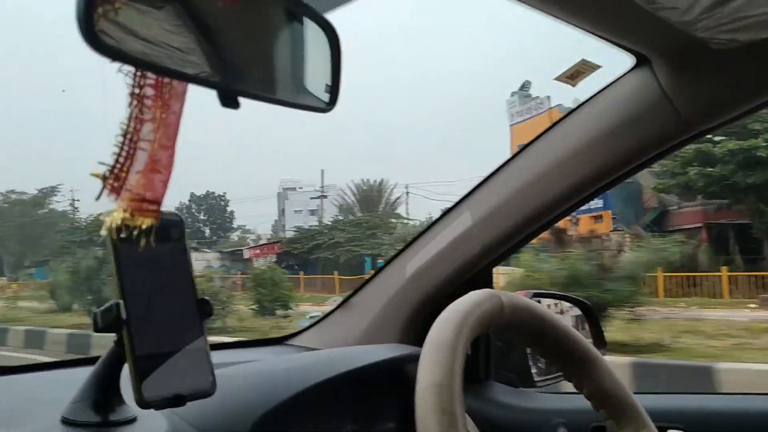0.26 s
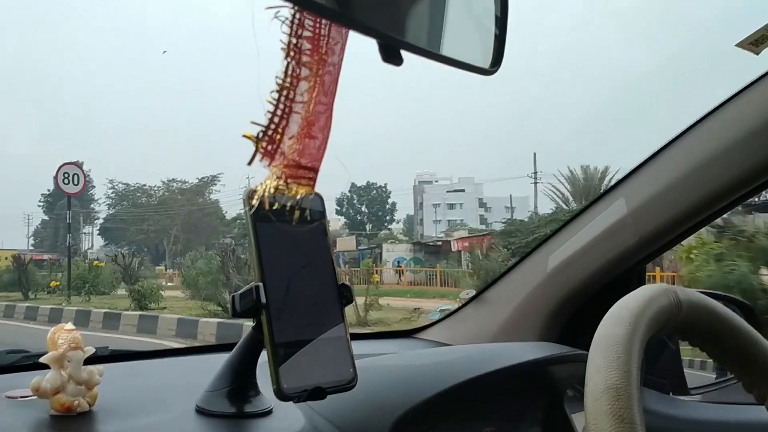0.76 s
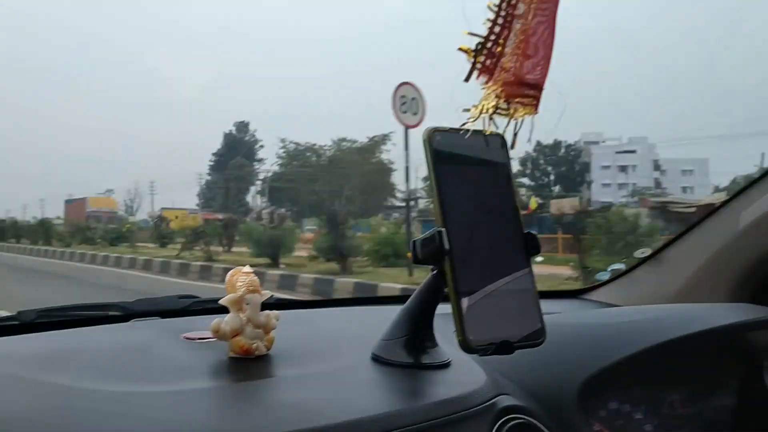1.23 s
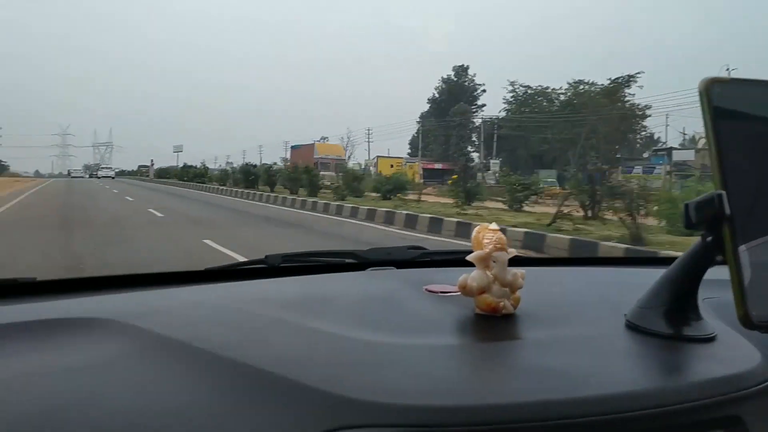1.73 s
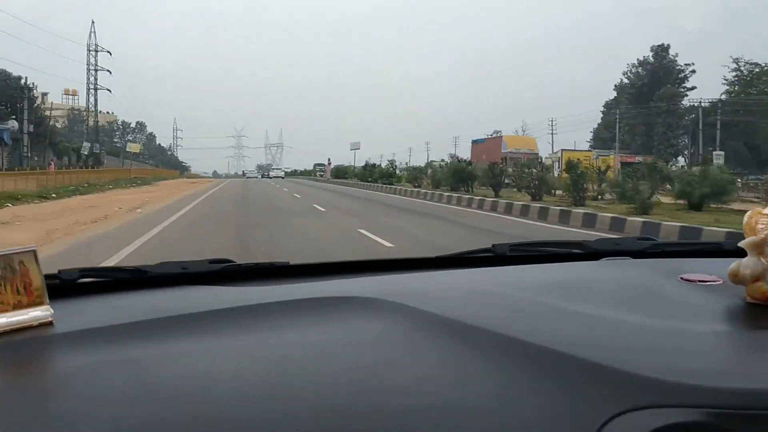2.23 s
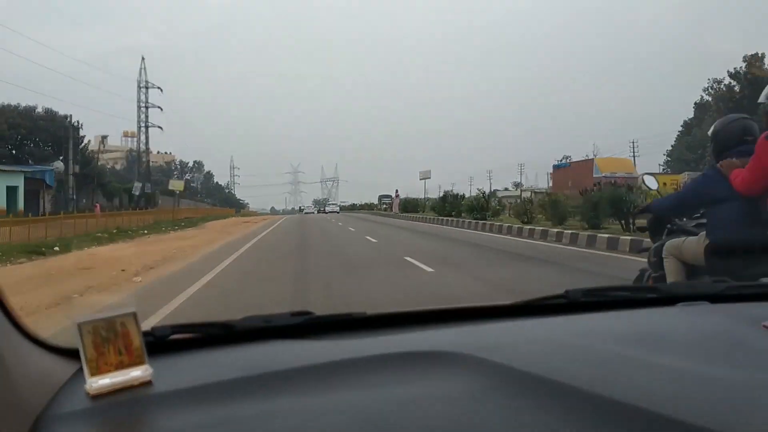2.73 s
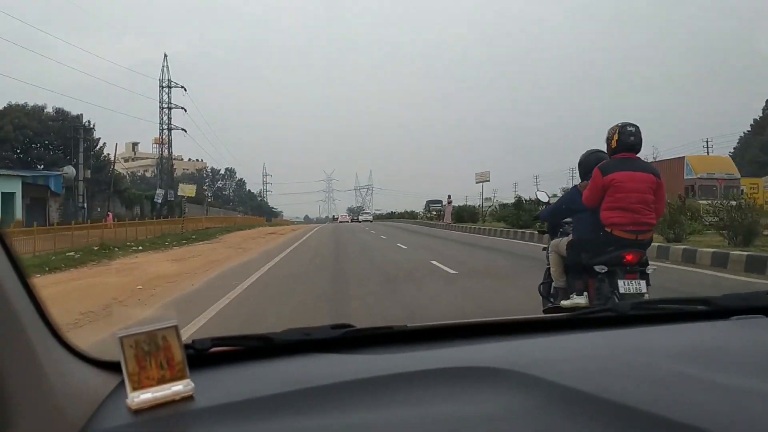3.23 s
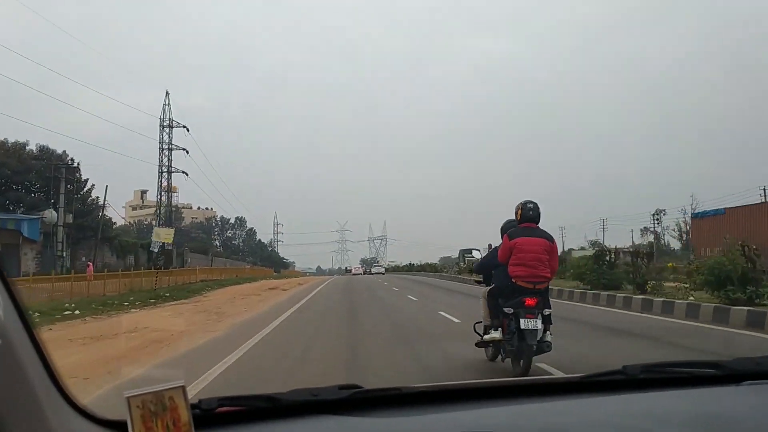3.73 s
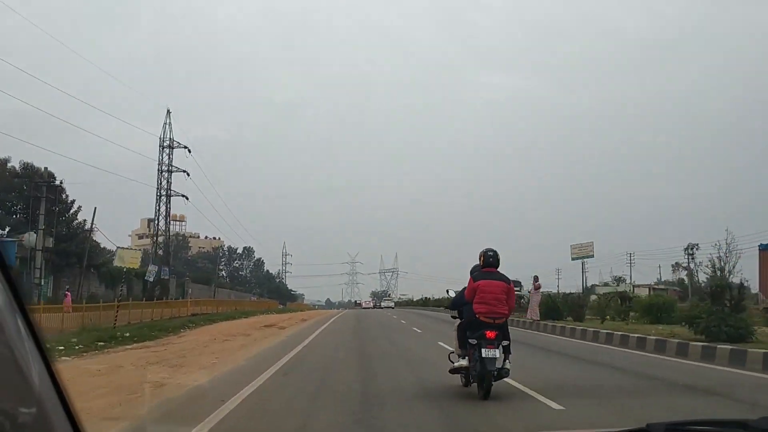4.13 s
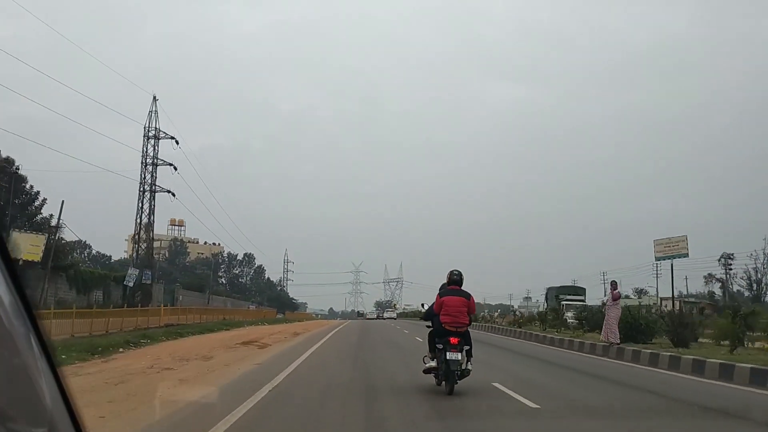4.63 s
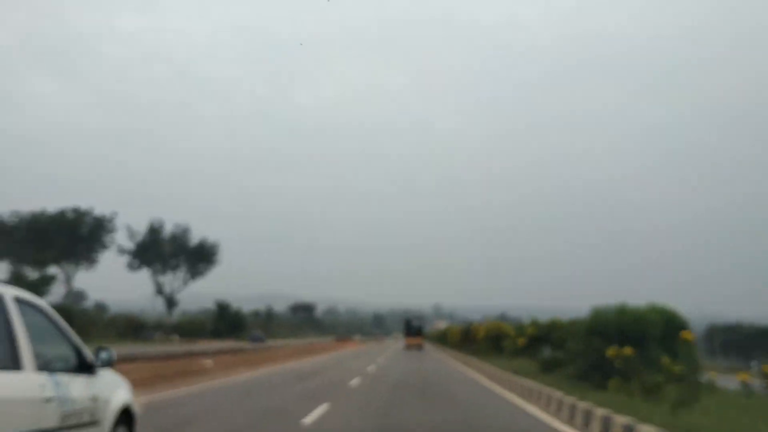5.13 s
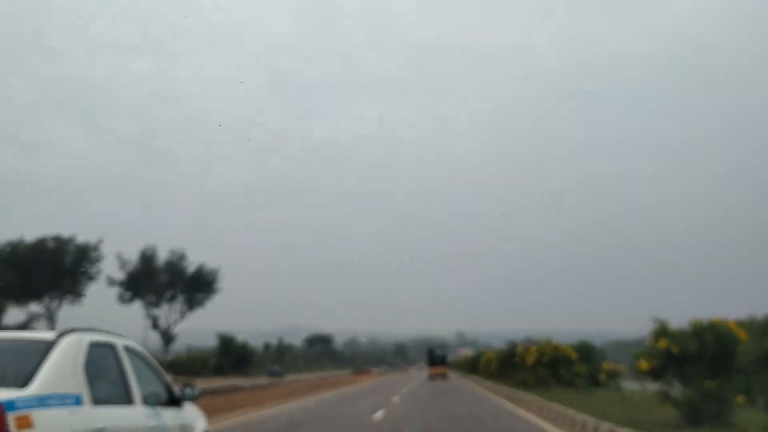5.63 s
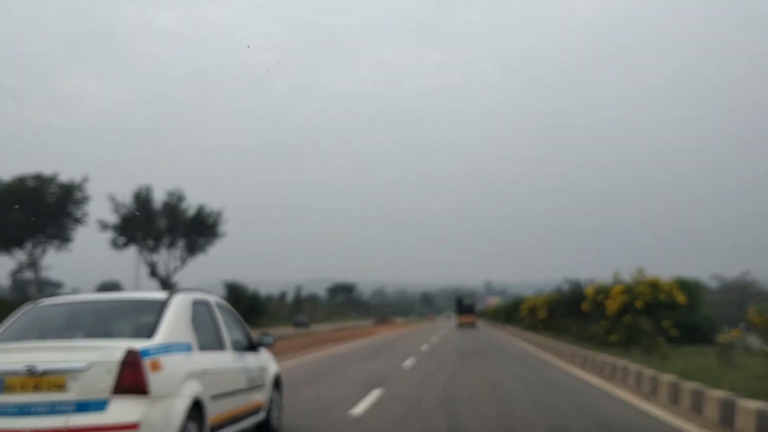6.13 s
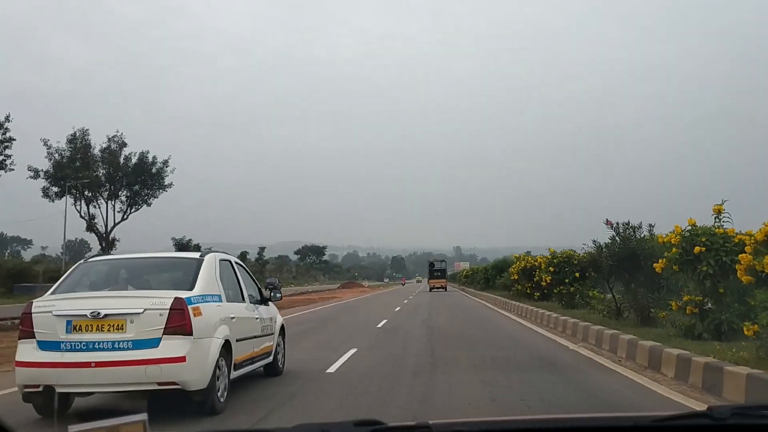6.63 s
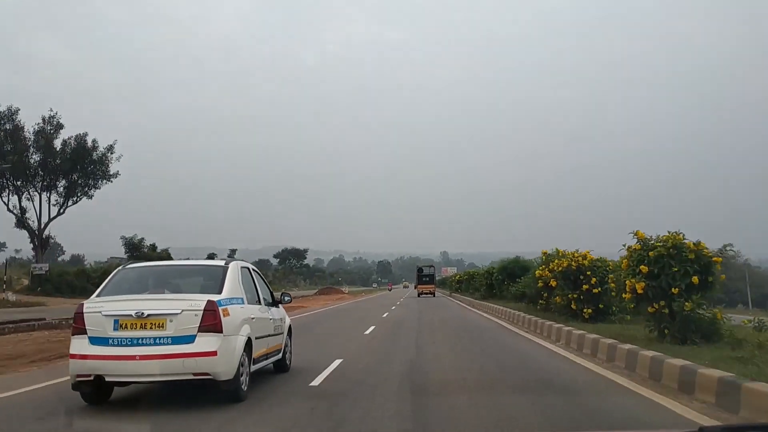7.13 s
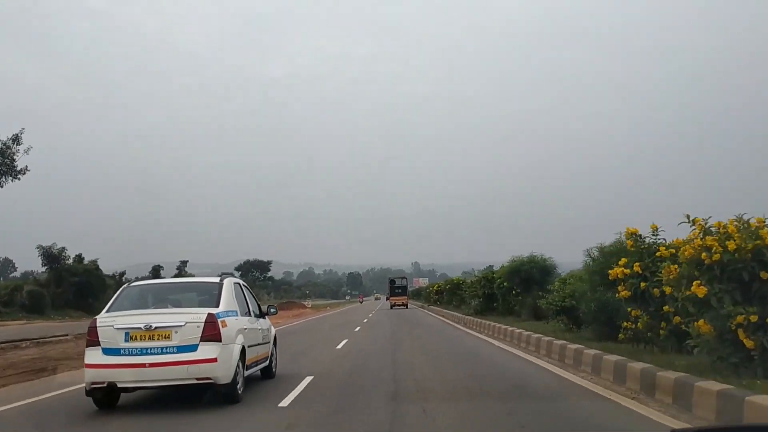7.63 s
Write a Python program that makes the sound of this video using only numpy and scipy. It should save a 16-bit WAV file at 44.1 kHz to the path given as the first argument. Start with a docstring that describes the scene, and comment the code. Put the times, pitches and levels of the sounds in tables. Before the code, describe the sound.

Close cabin sound, dominated by low road rumble. Window glass rattles free with a few dry clacks and a soft pressure thump, then wind and tyre hiss enter as a motorbike overtakes with a raspy, pulsing exhaust and recedes. Sound cuts out for an instant, returns with a snap and builds into heavier bass, throbbing with the wheel, as a neighbouring car adds rushing air, a wavering tread hum and small trim ticks.

```python
"""Inside a car on a highway, two stretches of the drive joined by a short silence.
First: shaped noise gives body boom, tyre roar and seal wind; noise bursts clack the side window open,
letting in air and tyre hiss; a motorbike overtakes, its firing pulses ringing resonators; trim clicks.
Then: louder, swelling up from the silence; a car draws alongside in noise bands, a tread hum and ticks;
a sine throbs once per wheel turn and trim ticks along with it."""
import sys
import numpy as np
from scipy import signal
from scipy.fft import rfft, irfft, next_fast_len
from scipy.io import wavfile

SR = 44100
rng = np.random.default_rng(int(sys.argv[2]) if len(sys.argv) > 2 else 0)


def output_pcm(signal):
    """Save a mono or channel-first signal as 16-bit PCM at the path in sys.argv[1].

    Samples are clipped to [-1, 1] before scaling.
    """
    pcm = np.clip(np.atleast_2d(signal).T, -1, 1) * 32767
    wavfile.write(sys.argv[1], SR, np.round(pcm).astype(np.int16))


N = 347508
TIME = np.arange(N) / SR

# silence between the stretches
SILENCE_START_S, SILENCE_END_S = 4.901, 5.024
LATER = TIME > SILENCE_END_S
FADE_OUT_S, FADE_IN_S = .008, .001

# cabin; noise spectra are relative: freq_hz, density_db
# body boom, first stretch: freq_hz, density_db
BOOM_FIRST = [(7.1, -42.5), (12, -1), (27, 3.5), (45, -3.5), (65, -3), (81, -13.5), (134, -7), (146, -5),
              (172, -13.5), (198, -14.5), (221, -28), (243, -31), (330, -33), (430, -47), (730, -120)]
# body boom, second stretch: freq_hz, density_db
BOOM_SECOND = [(1.8, -39.5), (3.0, 3), (16, 7.5), (26, -3.5), (47, -3), (75, -9), (139, -10), (210, -22.5),
               (246, -32), (330, -30.5), (430, -34), (730, -120)]
# body panel resonances: freq_hz, width_hz (of one pass), level_db (over the boom)
PANELS = [(23.2, 8, -16), (50.7, 5.8, -11), (98.79, 9.6, -17), (144.7, 19.5, -18.5), (194, 17, -30),
          (244.7, 7.8, -37.5), (397, 63, -38.5)]
# tyre roar in the closed cabin, first stretch: freq_hz, density_db
ROAR_FIRST = [(150, -10), (250, -8), (353, -10.5), (413, -3.5), (452, -11.5), (505, -16), (565, -16.5),
              (624, -15), (675, -15), (943, -21), (1100, -17), (1190, -16.5), (1600, -22.5), (2500, -26),
              (3200, -36.5), (3800, -38.5), (4680, -76.5), (7920, -120)]
# tyre roar, second stretch: freq_hz, density_db
ROAR_SECOND = [(150, -43), (250, 2), (328, -7.5), (459, -7), (543, -15), (780, -15), (854, -17),
               (1150, -10), (1490, -13.5), (2080, -21), (3110, -34), (3830, -30.5), (5500, -41.5),
               (7150, -73), (12100, -120)]
# wind past the door seals: freq_hz, density_db
SEALS = [(2060, -31), (3500, -28), (3770, -1), (4610, -7), (6540, -6), (7940, -6), (11800, -13.5),
         (14800, -0.5), (15600, 0)]
# air pumping at the open window: freq_hz, density_db
BUFFET = [(3, 6), (6, 0), (12, -16), (18, -37)]
# cabin base levels: first_stretch_db, second_stretch_db
BOOM_DB, ROAR_DB, SEALS_DB = (-24, -15.5), (-46, -38), (-65, -63)
BOOM_RISE_DB_PER_S = 0.66  # first stretch, reaching the base level at its end
BUMPS_DB = 1.1  # spread; uneven road swells the whole boom at once
SWELL_DB, SWELL_TIME_CONSTANT_S = 12, 0.53  # shortfall just after the silence; how it dies
BOOM_SHARE, ROAR_SHARE, SEALS_SHARE, THROB_SHARE = 1, 1.46, 0.96, 3.5  # of that shortfall

# window: glass leaves its seal, then drops
AJAR_S, OPEN_S, OPENING_S, AJAR_DB = .84, 0.94, 0.017, -11
BUFFET_STEADY_DB = -37
THUMP_DB, THUMP_S, THUMP_SPREAD_S = -22, 0.926, 0.086  # pressure thump as the glass drops
# glass freeing itself: start_s, peak_db, centre_hz, half_width_octaves, rise_s
GLASS = [(.836, -37, 11800, 0.73, 0.0018), (.845, -37, 990, .6, .004), (.879, -36.5, 1000, 0.67, .002),
         (.892, -32.5, 1950, 0.39, 0.0011), (.893, -36, 3000, 0.32, 0.001),
         (.926, -39.5, 7600, 0.148, 0.016), (.945, -35.5, 8000, .25, .01), (.936, -34, 14400, .15, 0.0022),
         (0.947, -33, 2300, 0.4, 0.006), (0.948, -33, 4200, 0.46, 0.0068), (0.977, -37, 3760, 0.17, .002),
         (1.075, -37, 3780, 0.167, .001)]
GLASS_T60_S = 0.056
DOOR_HZ, DOOR_DB = 794, -8  # door panel thud under each clack; dB over it

# outside air and motorbike
# air rush, first stretch: freq_hz, density_db
RUSH_FIRST = [(290, -44.5), (500, -9), (558, -8.5), (690, -2.5), (814, -7.5), (1700, -6), (2000, -6.5),
              (2640, -13), (3450, -38), (4500, -39), (5850, -65), (9900, -120)]
# tyre hiss, both stretches: freq_hz, density_db
HISS = [(1760, -0.5), (3000, 0.5), (3610, -6.5), (4700, -7), (5660, -6), (6540, -6), (8100, -2.5),
        (9360, -11), (13200, -6), (14400, -2), (15600, -0.5)]
TRAFFIC_DB, BIKE_RUSH_DB, BIKE_HISS_DB = -49, -43, -43  # steady far traffic; bike at its closest
RUSH_FALL, HISS_FALL, NOTE_FALL = 1.5, 1.47, 0.98  # powers of distance
NEAREST_S, PASS_S = 1.487, 0.59  # closest approach; time to move one closest distance along
NOTE_LAG_S = 0.2  # low note peaks this long after closest approach
FIRINGS_PER_S, FIRINGS_RISE_PER_S2 = 47.2, .21  # rate at 0 s; gain each second
FIRING_SPREAD_DB, EXHAUST_RASP = 3.5, 1.2  # uneven firings; gas noise beside the puffs
EXHAUST_FLUTTER_DB, VALVE_FLUTTER_DB = 2.2, 3.2  # gusty path; rattle comes and goes
# exhaust resonances, each row one swell of a ringing band during the pass:
# freq_hz, t60_s (of one pass through the resonance), level_db (rms), loudest_s, spread_s
EXHAUST = [(700, .058, -49, 1.1, .06), (715, .06, -45.5, 1.48, .045), (710, .04, -48.5, 1.61, .03),
           (720, .045, -48, 1.79, .08), (623, .05, -53, 1.75, .3), (720, .059, -56, 2.35, .25),
           (730, .054, -55, 2.97, .3), (738, .074, -56.5, 4.02, .58), (1004, .021, -49, 1.07, .018),
           (1060, .03, -46.5, 1.22, .066), (1100, .04, -45, 1.43, .043), (1047, .05, -56, 2.1, .5),
           (1055, .05, -60, 3.9, .7), (1493, .03, -49, 1.75, .15), (1680, .03, -48.5, 1.17, .05),
           (1760, .03, -48, 1.45, .02), (1637, .034, -46, 1.65, .054), (1696, .025, -50, 1.95, .12),
           (1900, .02, -47, 1.18, .07), (1840, .033, -47, 1.75, .06), (1820, .02, -52.5, 2.27, .12),
           (1840, .016, -52.5, 2.55, .15), (1880, .02, -56, 2.9, .2), (1930, .035, -57, 3.2, .15),
           (1880, .02, -63, 3.7, .3), (2258, .022, -52, 1.55, .3), (2700, .012, -53, 1.07, .06),
           (2564, .012, -52.5, 1.33, .06), (2500, .018, -49, 1.46, .04), (2620, .033, -56, 1.95, .2),
           (2730, .03, -61, 3.05, .07)]
# treble rattle resonances, each row one swell of a ringing band as the bike goes by:
# freq_hz, t60_s (of one pass through the resonance), level_db (rms), loudest_s, spread_s
RATTLE = [(5800, .005, -57, 1.12, .1), (3640, .0073, -63, 2.72, .16), (3620, .008, -65.5, 3.3, .15),
          (3620, .007, -64, 3.82, .1), (3980, .008, -67, 3.07, .04), (6000, .0046, -65, 2.9, .17),
          (8190, .004, -62.5, 2.52, .48), (7350, .0062, -63.5, 3.1, .16), (6600, .005, -65, 2.85, .17),
          (7130, .003, -70, 4.22, .6), (7440, .0058, -65, 4.02, .25)]
# low harmonics of the firing rate: multiple, level_db (rms at the note's loudest)
EXHAUST_NOTE = [(3, -36.5), (5, -54), (6, -54)]

# trim
# clicks: start_s, peak_db, centre_hz, half_width_octaves
TRIM = [(3.275, -48, 8300, .15), (3.342, -44, 14600, .06), (3.418, -46, 7900, .08),
        (3.467, -46, 14300, .08), (3.485, -48, 7700, .08), (4.09, -53, 11000, .27),
        (5.889, -36, 14500, 0.3), (6.87, -47, 14500, .27), (7.419, -48, 14600, .27)]
TRIM_T60_S = 0.14
# one dry snap: start_s, peak_db, centre_hz, half_width_octaves, t60_s
SNAP = (5.09, -42, 6800, 1.35, .005)

# car alongside
# its air rush: freq_hz, density_db
RUSH_SECOND = [(350, -39), (600, -7), (919, -9.5), (1110, -1), (1660, -6), (2170, -5), (3020, -19),
               (5000, -44.5), (6500, -73), (11000, -120)]
# its engine and tread tones: freq_hz, width_hz (of one pass), level_db (over the rush)
CAR_TONES = [(103.2, 15, 0.5), (244.13, 8.05, -5), (725, 161, -13), (2070, 170, -16)]
# levels as it draws alongside: time_s, rush_db, hiss_db
CAR_LEVELS = [(5.03, -55, -78), (5.16, -46, -66), (5.55, -45.5, -66.5), (5.9, -40, -52), (6.3, -41.5, -60),
              (6.85, -43.5, -60), (7.4, -42, -60.5), (7.65, -41, -56.5), (7.88, -42, -60)]
# tread hum: time_s, pitch_hz
TREAD = [(5.1, 1123), (5.8, 1110), (6.5, 1129), (7.2, 1176), (7.88, 1153)]
TREAD_WIDTH_HZ, TREAD_WAVER_HZ, TREAD_DB = 80, 10, -2.5  # dB over the rush
CAR_TICKS_PER_S = 39.5
# what the injector ticks ring: freq_hz, t60_s (of one pass), level_db (rms), loudest_s, spread_s
INJECTORS = [(8250, 0.00108, -62.5, 5.96, 0.17), (14900, .0015, -59, 5.96, 0.086)]
# short whistle of air: freq_hz, t60_s (of one pass), level_db (rms), loudest_s, spread_s
WHISTLE = [(8000, .004, -65, 7.64, 0.055)]

# wheel
WHEEL_TURNS_PER_S, THROB_DB = 10.58, -20.5
# trim ticks on some wheel turns: start_s, peak_db
WHEEL_TICKS = [(5.3712, -57.5), (6.2413, -44), (6.4298, -44), (6.5251, -41), (6.6204, -54), (6.8088, -48),
               (6.998, -44), (7.1871, -47), (7.2804, -48), (7.376, -47)]

# output
OVERLOAD_PEAK, CUTOFF_HZ = 0.746, 15700


def from_db(db):
    """Gain of a level in dB."""
    return np.exp(np.asarray(db) * (np.log(10) / 20))


def rms_one(x):
    """Scale to rms 1."""
    return x / np.sqrt(np.mean(x ** 2) + 1e-20)


def in_time(rows):
    """Columns of a time table, interpolated at every sample."""
    time_s, *columns = np.transpose(rows)
    return [np.interp(TIME, time_s, column) for column in columns]


def drift(rate_hz):
    """Slow random wander of spread 1, about rate_hz changes a second."""
    step = 40  # samples between wander points
    r = np.exp(-2 * np.pi * rate_hz * step / SR)
    noise = rng.standard_normal(N // step + 2002)
    slow = signal.lfilter([1], [1, -2 * r, r * r], noise)[2000:]
    joined = np.linspace(slow[:-1], slow[1:], step, endpoint=False, axis=1).ravel()[:N]
    return joined / np.sqrt(np.mean(slow ** 2))


def coloured(spectrum, patchy_db, rate_hz, count=6):
    """Noise of this spectrum in overlapping bands flickering partly together, partly alone; rms 1."""
    size = next_fast_len(N)
    log_hz = np.log(np.arange(size // 2 + 1) * SR / size + 1e-9)
    freq_hz, density_db = np.transpose(spectrum)
    gain = from_db(np.interp(log_hz, np.log(freq_hz), density_db, -200, -200))
    shaped = rfft(rng.standard_normal(size)) * gain
    centres = np.linspace(np.log(freq_hz[0]), np.log(freq_hz[-1]), count)
    together = drift(rate_hz)
    out = 0
    for k in range(count):
        weight = np.interp(log_hz, centres, np.arange(count) == k)
        band = irfft(shaped * weight, size)[:N]
        out = out + band * from_db(patchy_db * (0.29 * together + 0.894 * drift(rate_hz)))
    return rms_one(out)


def resonant(modes, patchy_db):
    """Noise passed twice through each resonance, each swelling on its own."""
    out = 0
    for freq_hz, width_hz, level_db in modes:
        r = np.exp(-np.pi * width_hz / SR)
        poles = [1, -2 * r * np.cos(2 * np.pi * freq_hz / SR), r * r]
        once = signal.lfilter([1, 0, -1], poles, rng.standard_normal(N))
        twice = signal.lfilter([1, 0, -1], poles, once)
        out = out + rms_one(twice) * from_db(level_db + patchy_db * drift(4.8))
    return out


def burst(start_s, centre_hz, half_width_octaves, t60_s, rise_s=.0005):
    """Band of noise that rises quickly and dies; peak 1."""
    ratio = 2 ** half_width_octaves
    edges_hz = [centre_hz / ratio, min(centre_hz * ratio, .45 * SR)]
    after_s = TIME[:8192]
    decay = from_db(np.maximum(-60 * after_s / t60_s, -200))
    rise = np.minimum(after_s / max(rise_s, 1e-4), 1)
    puff = rng.standard_normal(len(after_s)) * decay * rise
    puff = signal.sosfilt(signal.butter(3, edges_hz, "band", fs=SR, output="sos"), puff)
    out = np.zeros(N)
    out[int(start_s * SR):][:len(after_s)] = puff / np.abs(puff).max()
    return out


def bell(peak_db, loudest_s, spread_s):
    """Gain that swells to peak_db at one moment and sinks again."""
    return from_db(peak_db) * np.exp(-.5 * ((TIME - loudest_s) / spread_s) ** 2)


def ringing(drive, freq_hz, t60_s):
    """Drive through one resonance twice, which keeps the ring narrow; rms 1."""
    r = from_db(-60 / (t60_s * SR))
    w = 2 * np.pi * freq_hz / SR
    section = [0.93, 0.0016, -0.944, 1, -2 * r * np.cos(w), r * r]
    return rms_one(signal.sosfilt([section] * 2, drive))


def struck(drive, swells, flutter_db=2.5):
    """Drive rings each resonance, which swells and sinks around its loudest moment and flutters."""
    out = 0
    for freq_hz, t60_s, level_db, loudest_s, spread_s in swells:
        gain = bell(level_db + flutter_db * drift(8.2), loudest_s, spread_s)
        out = out + ringing(drive, freq_hz, t60_s) * gain
    return out


def distance_db(nearest_s):
    """Distance of the passing motorbike over its closest distance, in dB."""
    return 10 * np.log10(1 + ((TIME - nearest_s) / PASS_S) ** 2)


def swell_db():
    """Shortfall of level just after the silence, dying away."""
    since_s = TIME - SILENCE_END_S
    return -SWELL_DB * np.exp(-np.abs(since_s) / SWELL_TIME_CONSTANT_S) * (since_s > 0)


def ajar_ramp():
    """Rises 0 to 1 as the glass leaves its seal."""
    return np.clip((TIME - AJAR_S) / OPENING_S, 0, 1)


def body_boom():
    """Road shakes the body: deep noise plus panel resonances, swelling over bumps."""
    first = coloured(BOOM_FIRST, 0.2, 7.5, count=4)
    second = coloured(BOOM_SECOND, 1.1, 9.6, count=4)
    boom = np.where(LATER, second, first) + resonant(PANELS, patchy_db=-0.5)
    rise_db = BOOM_RISE_DB_PER_S * np.minimum(TIME - SILENCE_START_S, 0)
    return boom * from_db(rise_db + BUMPS_DB * drift(7.6))


def tyre_roar():
    """Muffled tyre noise inside the cabin."""
    first = coloured(ROAR_FIRST, 0.57, 7.7, count=4)
    second = coloured(ROAR_SECOND, 0.53, 1.3, count=4)
    return np.where(LATER, second, first)


def cabin():
    """Boom, roar and seal wind at their level in each stretch."""
    seal_wind = coloured(SEALS, 4.7, 8.6, count=4)
    layers = [(body_boom(), BOOM_DB, BOOM_SHARE), (tyre_roar(), ROAR_DB, ROAR_SHARE),
              (seal_wind, SEALS_DB, SEALS_SHARE)]
    out = 0
    for sound, (first_db, second_db), share in layers:
        out = out + sound * from_db(np.where(LATER, second_db + share * swell_db(), first_db))
    return out


def buffeting():
    """Very low air pumping at the open window, first stretch, with a thump as the glass drops."""
    steady = from_db(BUFFET_STEADY_DB) * ajar_ramp() * ~LATER
    gain = steady + bell(THUMP_DB, THUMP_S, THUMP_SPREAD_S)
    return gain * coloured(BUFFET, 0.83, 1.5, count=2)


def glass_clacks():
    """Glass freeing itself: noise bursts, each with a door panel thud under it."""
    out = 0
    for start_s, peak_db, centre_hz, half_width_octaves, rise_s in GLASS:
        clack = burst(start_s, centre_hz, half_width_octaves, GLASS_T60_S, rise_s)
        thud = burst(start_s, DOOR_HZ, 0.22, GLASS_T60_S, rise_s)
        out = out + from_db(peak_db) * (clack + from_db(DOOR_DB) * thud)
    return out


def outside():
    """Air, passing tyres and engines, let in once the window opens."""
    far_db = distance_db(NEAREST_S)
    rush_db, hiss_db = in_time(CAR_LEVELS)
    bike_gain = from_db(BIKE_RUSH_DB - RUSH_FALL * far_db)
    first_gain = np.hypot(from_db(TRAFFIC_DB), bike_gain)  # powers add
    first_rush = first_gain * coloured(RUSH_FIRST, 1.24, 6.74, count=4)
    rush = np.where(LATER, from_db(rush_db) * car_rush(), first_rush)
    hiss_gain = from_db(np.where(LATER, hiss_db, BIKE_HISS_DB - HISS_FALL * far_db))
    hiss = hiss_gain * coloured(HISS, 1.7, 25.0)
    still_ajar = np.clip(1 - (TIME - OPEN_S) / OPENING_S, 0, 1)
    window = ajar_ramp() * from_db(AJAR_DB * still_ajar)
    return window * (rush + hiss + motorbike() * ~LATER + car_engine())


def motorbike():
    """Firings drive exhaust resonances with rasping puffs, a treble rattle with noisy knocks; a low note hums."""
    firings = FIRINGS_PER_S * TIME + FIRINGS_RISE_PER_S2 * TIME ** 2 / 2
    phase = firings % 1
    pulses = np.diff(np.floor(firings), prepend=0) * from_db(rng.normal(0, FIRING_SPREAD_DB, N))
    gas = rng.standard_normal(N) * (.4 + np.exp(-phase / 0.42))
    puffs = rms_one(pulses) + EXHAUST_RASP * gas
    knocks = rng.standard_normal(N) * np.exp(-phase / 0.3)
    note = 0
    for multiple, level_db in EXHAUST_NOTE:
        tone = np.sqrt(2) * np.sin(2 * np.pi * multiple * firings)
        note = note + tone * from_db(level_db + 2.2 * drift(3.0))
    note = note * from_db(-NOTE_FALL * distance_db(NEAREST_S + NOTE_LAG_S))
    exhaust = struck(puffs, EXHAUST, flutter_db=EXHAUST_FLUTTER_DB)
    rattle = struck(knocks, RATTLE, flutter_db=VALVE_FLUTTER_DB)
    return exhaust + rattle + note


def trim_clicks():
    """Cabin trim: short noise clicks and one dry snap."""
    start_s, peak_db, centre_hz, half_width_octaves, t60_s = SNAP
    out = from_db(peak_db) * burst(start_s, centre_hz, half_width_octaves, t60_s)
    for start_s, peak_db, centre_hz, half_width_octaves in TRIM:
        out = out + from_db(peak_db) * burst(start_s, centre_hz, half_width_octaves, TRIM_T60_S)
    return out


def car_rush():
    """Air rush in the second stretch, with the other car's resonant tones and tread hum."""
    air = coloured(RUSH_SECOND, 1.0, 6.8, count=4)
    return air + resonant(CAR_TONES, patchy_db=-1.5) + from_db(TREAD_DB) * tread_hum()


def tread_hum():
    """Narrow band of noise riding on the tread's wavering pitch; rms 1."""
    pitch_hz, = in_time(TREAD)
    phase = 2 * np.pi * np.cumsum(pitch_hz + TREAD_WAVER_HZ * drift(3.992)) / SR
    lowpass = signal.butter(2, TREAD_WIDTH_HZ / 2, fs=SR, output="sos")
    slow = signal.sosfilt(lowpass, rng.standard_normal((2, N)))
    return rms_one(slow[0] * np.cos(phase) + slow[1] * np.sin(phase))


def wheel():
    """Out-of-round wheel: cabin air throbs as a sine each turn; trim ticks on some turns."""
    sine = np.sqrt(2) * np.sin(2 * np.pi * WHEEL_TURNS_PER_S * TIME)
    throb = sine * from_db(THROB_DB + THROB_SHARE * swell_db() + 0.62 * drift(0.97))
    ticks = sum(from_db(peak_db) * burst(start_s, 10400, 1.0, 0.026) for start_s, peak_db in WHEEL_TICKS)
    return throb * LATER + ticks


def car_engine():
    """Injector ticks, thin and bright, while the other engine is level; later a whistle of air."""
    phase = (TIME - 5.962) * CAR_TICKS_PER_S % 1
    ticks = rng.standard_normal(N) * np.exp(-phase / 0.237)
    return struck(ticks, INJECTORS) + struck(rng.standard_normal(N), WHISTLE)


def scene():
    """All sources at one microphone."""
    mix = cabin() + buffeting() + glass_clacks() + outside() + trim_clicks() + wheel()
    return mix[None]


def record(dry):
    """Peaks round off; the sound fades quickly into the silence and back; the top is cut."""
    fade_out = (SILENCE_START_S - TIME) / FADE_OUT_S
    fade_in = (TIME - SILENCE_END_S) / FADE_IN_S
    gate = np.clip(np.maximum(fade_out, fade_in), 0, 1)
    rounded = OVERLOAD_PEAK * np.tanh(dry / OVERLOAD_PEAK)
    lowpass = signal.ellip(14, .3, 80, CUTOFF_HZ, fs=SR, output="sos")
    return signal.sosfilt(lowpass, rounded * gate)


dry = scene()
out = record(dry)
output_pcm(out)
```